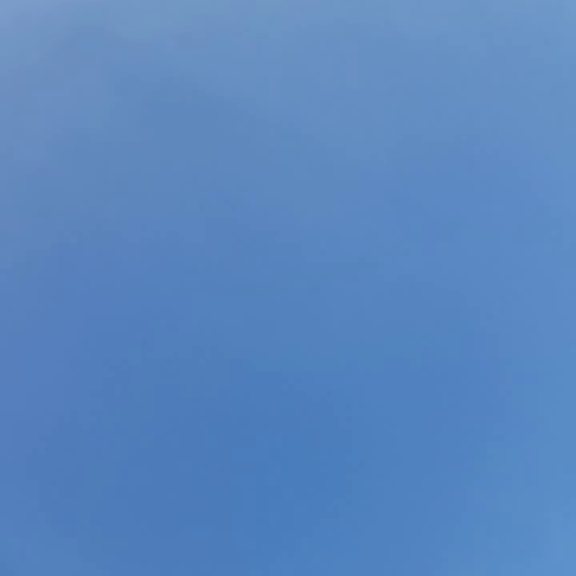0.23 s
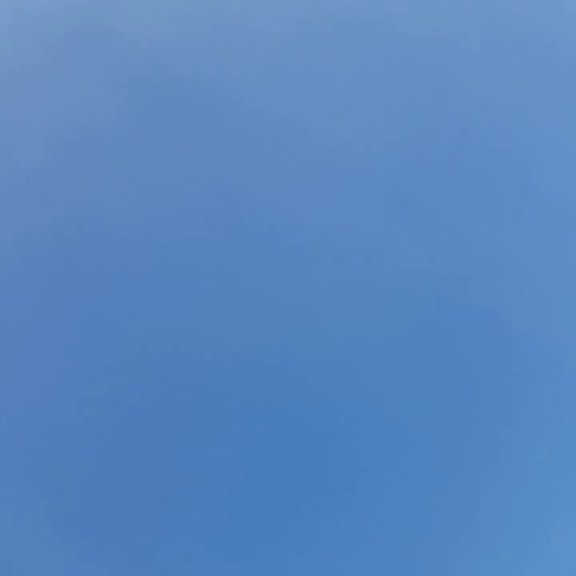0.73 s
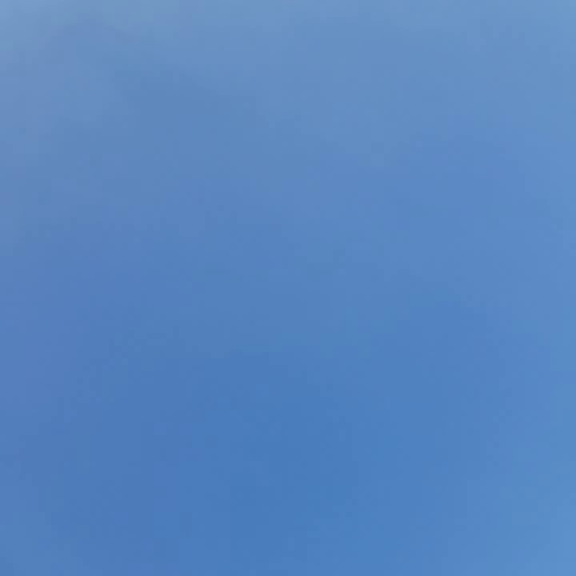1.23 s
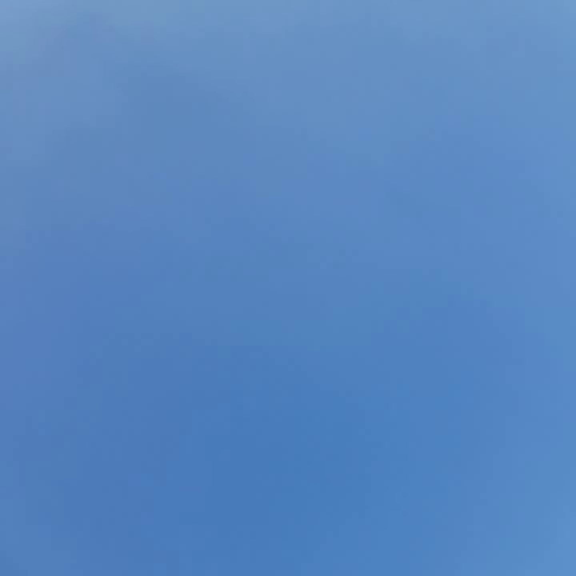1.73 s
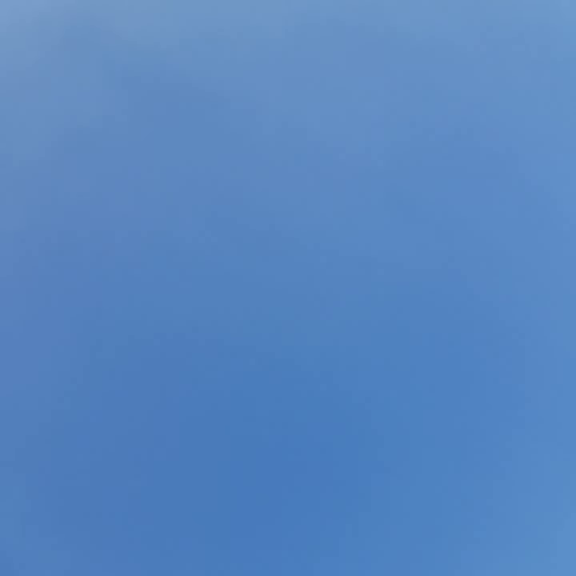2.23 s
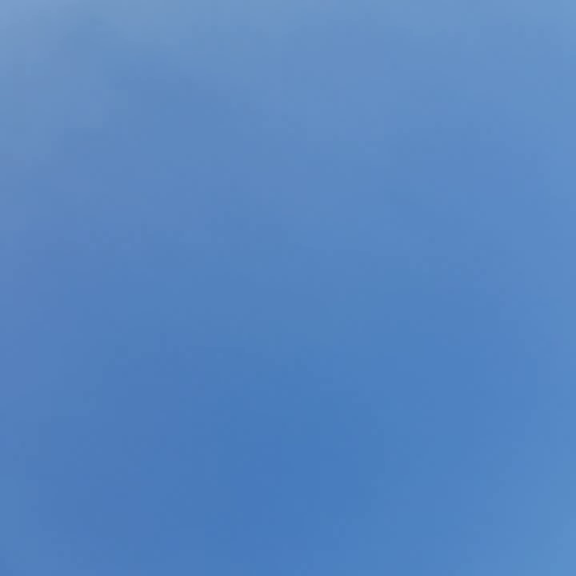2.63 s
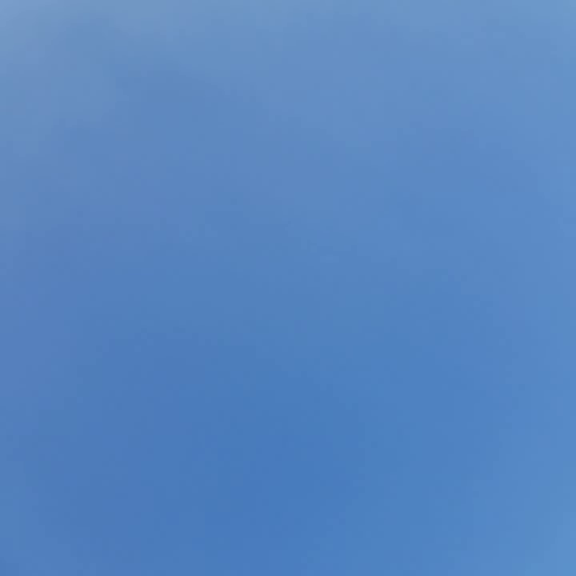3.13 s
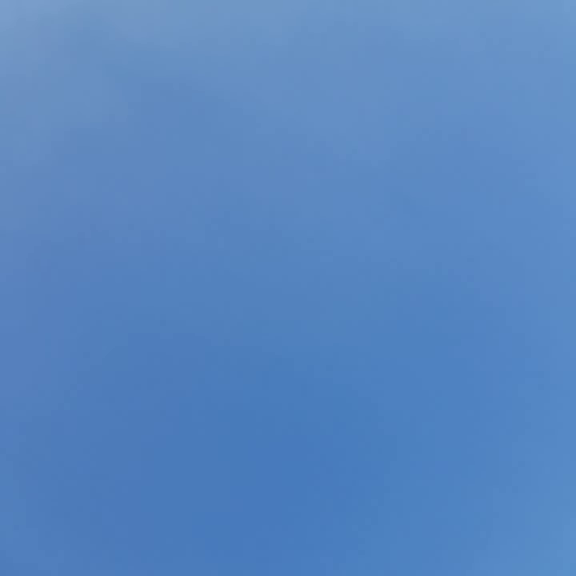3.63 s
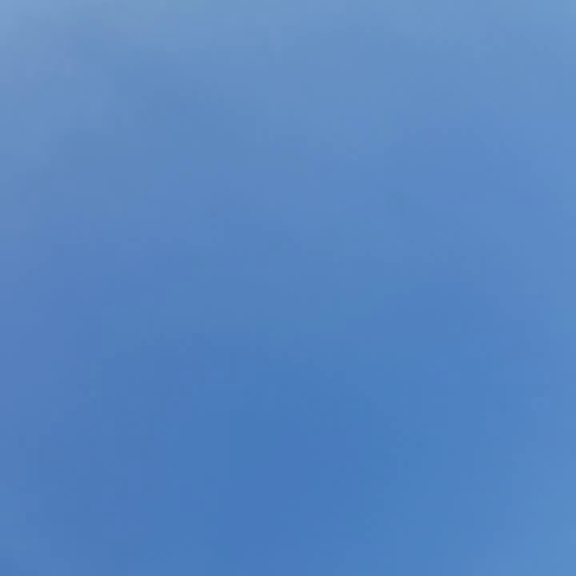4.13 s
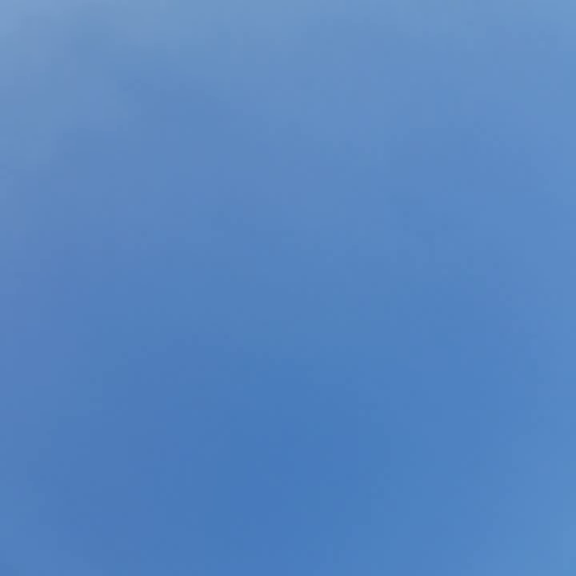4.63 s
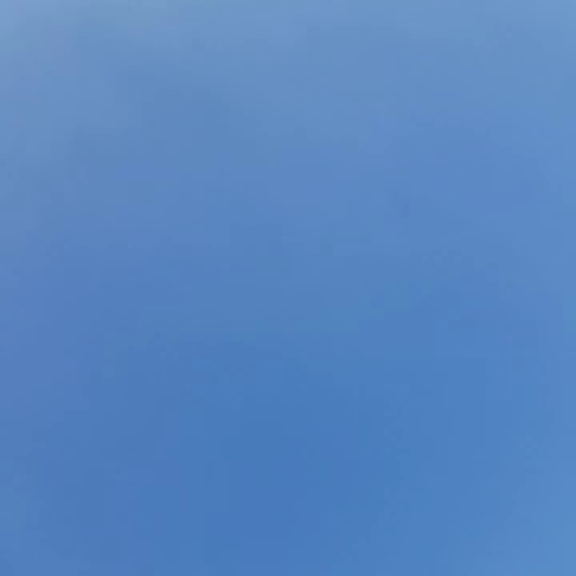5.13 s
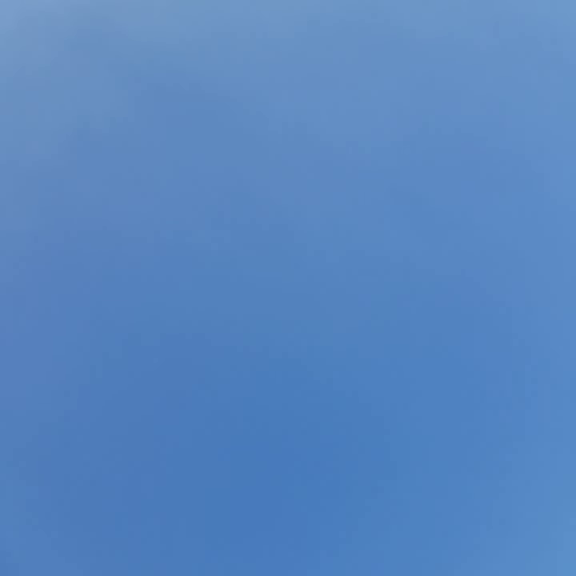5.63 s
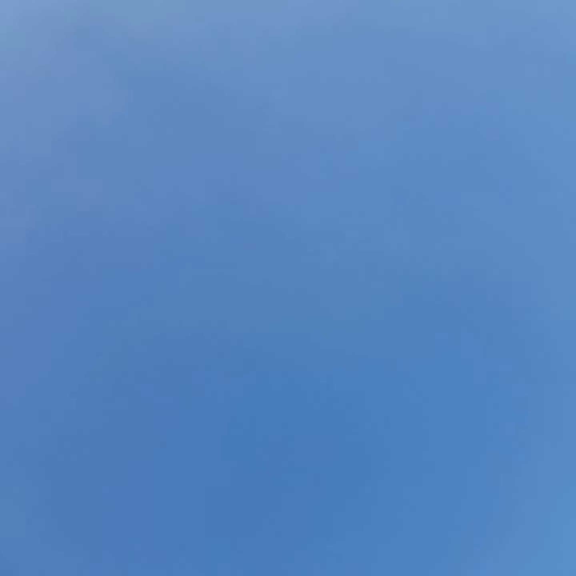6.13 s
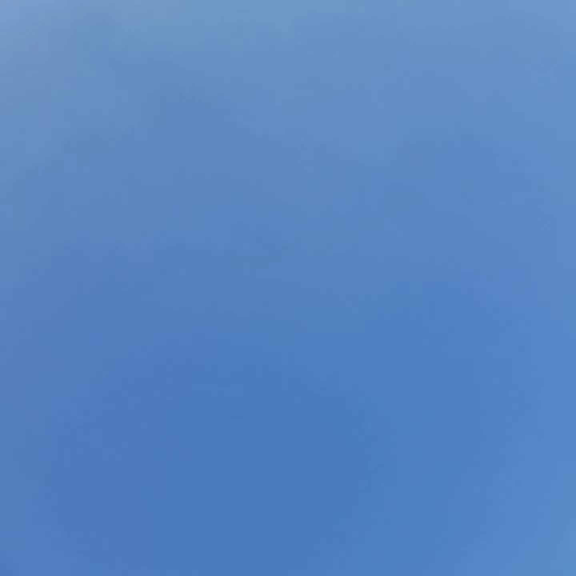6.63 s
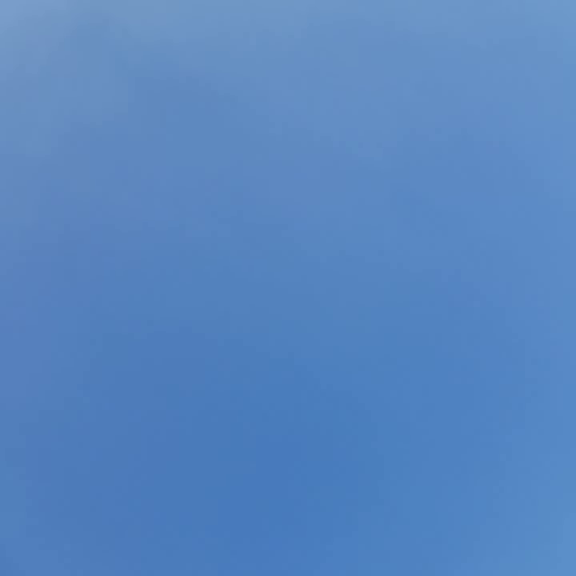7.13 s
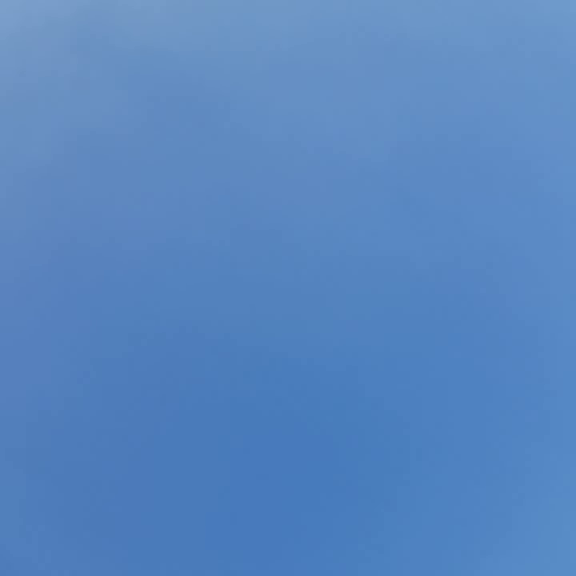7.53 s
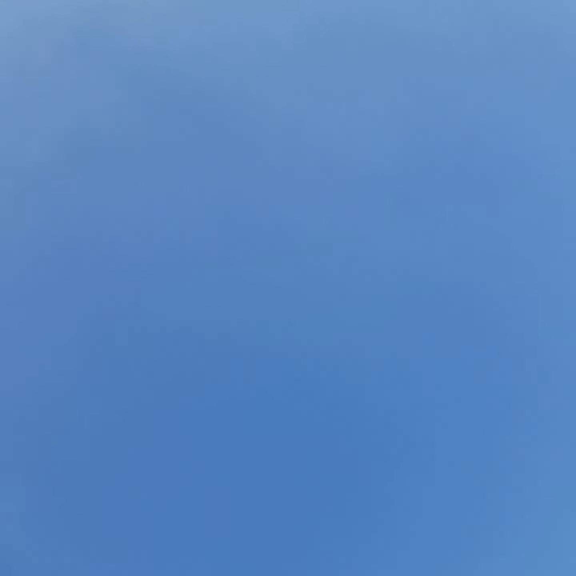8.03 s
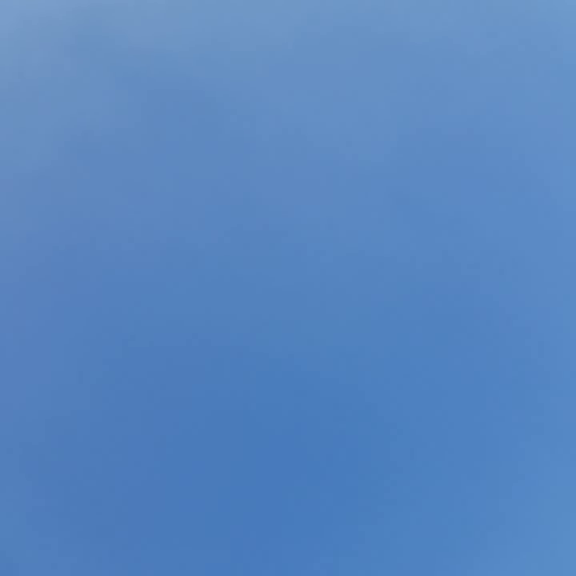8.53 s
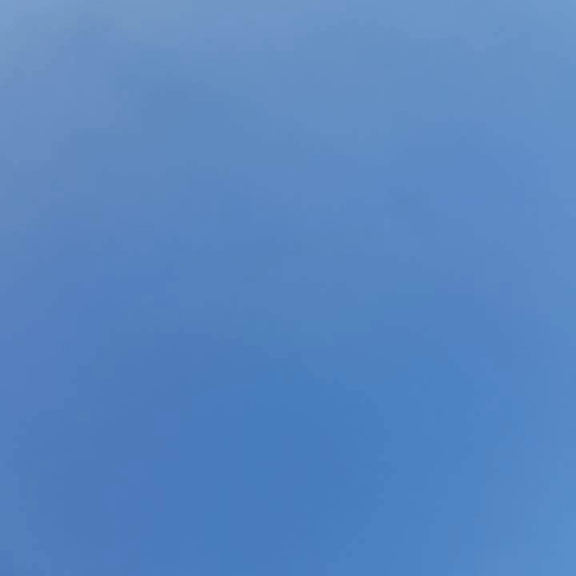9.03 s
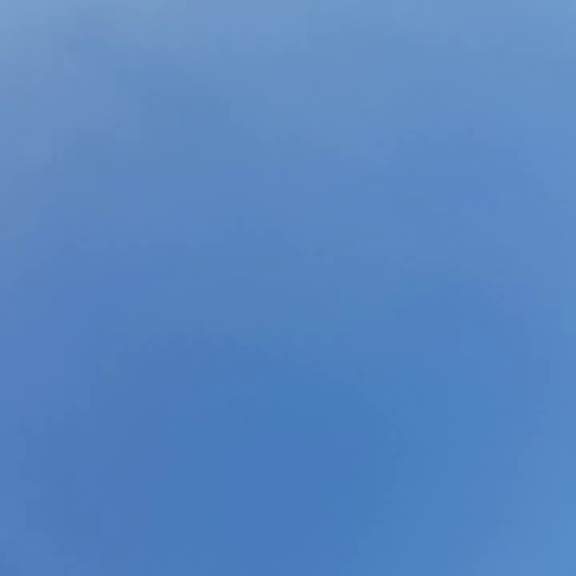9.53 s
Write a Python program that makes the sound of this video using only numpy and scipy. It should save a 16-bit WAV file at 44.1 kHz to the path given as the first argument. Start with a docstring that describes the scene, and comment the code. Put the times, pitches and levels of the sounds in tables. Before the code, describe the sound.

Dawn chorus in stereo: slurs, thin lisps, chips and buzzy notes from birds near and far, with soft dove coos and distant road drone.

```python
"""Among echoing trees at dawn, two spaced microphones hear songbirds near and far over a distant road.
Birds whistle, slur, chip and buzz, each a gliding tone with its own perch and echo; a dove coos far off.
A blur of farther birds lies behind them. Shaped noise makes the blur, the engine drone and tyre roar
of the traffic, and a faint hiss."""
import sys
import numpy as np
from scipy import signal
from scipy.fft import rfft, irfft, next_fast_len
from scipy.io import wavfile
from scipy.ndimage import uniform_filter1d, map_coordinates

SR = 44100
rng = np.random.default_rng(int(sys.argv[2]) if len(sys.argv) > 2 else 0)


def to_wav(s):
    """Save 16-bit WAV."""
    ch = np.atleast_2d(s).T  # columns
    pcm = np.round(np.clip(ch, -1, 1) * 32767)  # PCM
    wavfile.write(sys.argv[1], SR, pcm.astype(np.int16))


N = 431298  # length of the scene in samples

# In the note tables level_db is relative: add() and placed() apply further gains.


def amp(db):
    """Turn dB into a gain."""
    return 10 ** (np.asarray(db) / 20)


def unit(x):
    """Scale a sound to rms 1."""
    return x / np.sqrt(np.mean(x ** 2) + 1e-20)


def along(points, hz):
    """Read a curve of (Hz, value) points, straight between them on a log-frequency axis."""
    point_hz, value = np.transpose(points)
    return np.interp(np.log(hz + 1), np.log(point_hz + 1), value)


def wobble(rate, size=N):
    """A smooth random curve through rate knots a second."""
    knots = rng.standard_normal(int(size * rate / SR) + 4)
    return map_coordinates(knots, [np.arange(size) * rate / SR])


def filtered(x, response):
    """Weight the spectrum of x by a response of frequency."""
    size = next_fast_len(N + 8192)
    spectrum = rfft(x, size) * response(np.fft.rfftfreq(size, 1 / SR))
    return irfft(spectrum, size)[..., :N]


def rush(spectrum):
    """Stereo noise of rms 1: mid and side shares set how alike the microphones are at each frequency."""
    # likeness of the two microphones: hz, left_right_correlation (-1 to 1)
    likeness = [(60, 0.98), (180, 0.94), (550, 0.56), (1650, -0.49), (4970, 0.79), (15000, -0.094)]

    def mid_side_shares(hz):
        """The correlation is the cosine of twice the mid-side angle."""
        angle = np.arccos(np.clip(along(likeness, hz), -1, 1)) / 2
        return amp(along(spectrum, hz)) * [np.cos(angle), np.sin(angle)]

    mid, side = filtered(rng.standard_normal((2, N)), mid_side_shares)
    return unit(np.array([mid + side, mid - side]))


def arc(start_hz, middle_hz, end_hz):
    """A note's pitch as a parabola through three pitches."""
    u = np.linspace(-1, 1, num=9)
    slope = (end_hz - start_hz) / 2
    bend = (start_hz + end_hz) / 2 - middle_hz
    return middle_hz + u * slope + u * u * bend


def series(s, step, count, *ends):
    """Evenly spaced times, with each (first, last) pair drifting from one value to the other."""
    k = np.arange(count)
    drifts = [first + (last - first) * k / (count - 1) for first, last in np.reshape(ends, (-1, 2))]
    return zip(s + step * k, *drifts)


def add(out, s, length, pitch, db, pan_db=0, swing_hz=0, flutter_hz=0, edge=0.0047, octave_db=-48,
        swell=0.043, smooth=8):
    """Add one note: an unsteady gliding tone and a weak octave, made burry by frequency modulation."""
    t = np.arange(int((length + edge) * SR)) / SR
    hz = np.interp(t, np.linspace(0, length, len(pitch)), pitch)
    hz = uniform_filter1d(hz, len(t) // smooth + 1, mode="nearest")  # rounds the glide's corners
    hz = hz * (1 + 0.0053 * wobble(90.8, size=len(t)))
    beat = 2 * np.pi * np.cumsum(flutter_hz * (1 + .05 * wobble(40, size=len(t)))) / SR
    rasp = swing_hz ** 2 / 4000 * wobble(300, size=len(t))  # wide swings turn irregular
    phase = 2 * np.pi * (np.cumsum(hz + swing_hz * np.sin(beat) + rasp) / SR + rng.random())
    # swell is the share of the length taken to start; edge (s) is the shortest rise or fall
    rise = t / max(edge, swell * length)
    fall = (t[-1] - t) / max(edge, 0.2 * length)
    shape = np.sin(np.pi / 2 * np.clip(np.minimum(rise, fall), 0, 1)) ** 2
    tone = np.sin(phase) + amp(octave_db) * np.sin(2 * phase)
    tone = tone * shape * amp(db + 6 + 0.51 * wobble(60.3, size=len(t)))
    start = round(s * SR)
    stereo = tone * amp([[pan_db / 2], [-pan_db / 2]])  # positive pan is louder on the left
    out[:, start:start + len(t)] += stereo[:, :N - start]


def placed(dry, bearing, direct_db, echo_db):
    """The nearer microphone hears the perch first (-1 left, 1 right); trunks and leaves return a tail."""
    spacing = 21  # samples of travel between the microphones
    # decay of the echo among the trees: hz, t60_s
    trees = [(500, 0.14), (2500, 0.99), (5000, 0.75), (8000, 0.48)]
    late = np.pad(dry, ((0, 0), (round(abs(bearing) * spacing), 0)))[:, :N]
    direct = np.array([dry[0], late[1]] if bearing < 0 else [late[0], dry[1]])
    hz, t, grains = signal.stft(rng.standard_normal((2, SR)), SR, nperseg=256)
    decay = amp(-60 * t / along(trees, hz)[:, None])  # treble dies sooner than the middle
    onset = 1 - np.exp(-t / 0.0018)
    tail = signal.istft(grains * decay * onset, SR, nperseg=256)[1]
    tail = tail / np.linalg.norm(tail[0])
    echo = signal.fftconvolve(dry.mean(axis=0)[None], tail, axes=1)[:, :N]
    return amp(direct_db) * direct + amp(echo_db) * echo


def singer(notes, pan_db, bearing, direct_db, echo_db, **voice):
    """All notes (start, length, pitches, level) of one voice, heard from one perch with its echo."""
    out = np.zeros((2, N))
    for s, length, *pitch, db in notes:
        add(out, s, length, pitch, db, pan_db, **voice)
    return placed(out, bearing, direct_db, echo_db)


def traffic():
    """Distant road: a drifting low engine drone under a steadier tyre roar, both shaped noise."""
    # how the road swells and sinks: start_s, engine_drone_db, tyre_roar_db
    levels = [(0.0, -51, -51.5), (1.8, -54.5, -52), (5.3, -52.5, -52.5), (6.1, -56, -53.5),
              (6.8, -50.5, -52.5), (7.52, -54.5, -51.5), (7.68, -56, -53), (8.83, -52, -54.5),
              (9.78, -55, -55)]
    # relative spectra of engines and tyres: hz, density_db
    drone_spectrum = [(12, -47), (20, -39.5), (43, -1.5), (59, 4.5), (130, -6.5), (162, -18.5),
                      (200, -15.5), (260, -49), (440, -120)]
    roar_spectrum = [(82, -27.5), (140, -6), (238, -8.5), (334, -4.5), (595, -4.5), (824, -1.5),
                     (1210, -10), (1680, -22), (1890, -26), (2500, -26), (3250, -33.5), (5500, -120)]
    s, drone_db, roar_db = np.transpose(levels)
    t = np.arange(N) / SR
    drone_gain = amp(np.interp(t, s, drone_db) + 1.1 * wobble(5.0))
    roar_gain = amp(np.interp(t, s, roar_db) + 1.1 * wobble(2.545))
    return drone_gain * rush(drone_spectrum) + roar_gain * rush(roar_spectrum)


def far_chorus():
    """Random far chirps that arrive almost wholly as echo, over a noise blur of still farther birds."""
    # relative spectrum of the birds blurred together: hz, density_db
    blur_spectrum = [(880, -30), (1500, -4.5), (1720, -18), (3990, -3.5), (5660, -1.5), (7610, -1.5),
                     (9200, -48), (12000, -72.5), (20200, -120)]
    out = np.zeros((2, N))
    for when, long, high, glide, size in rng.random((90, 5)):
        hz = 2400 * 2.9 ** high
        add(out, when * N / SR, 0.027 + 0.046 * long, (hz, hz * (0.99 + .5 * glide)), -80 + 7 * size)
    blur = amp(-77 + .8 * wobble(3)) * rush(blur_spectrum)
    return placed(out, 0, -99, 0) + blur


def lisps():
    """Thin notes on the left: both sides of the voice box sound, 520 Hz apart, each fluttering."""
    # when the notes come: start_s, length_s, level_db
    thin_notes = [(0, 0.076, -57.5), (0.16, 0.18, -61.5), (0.493, 0.152, -66.5), (0.996, 0.094, -59),
                  (1.362, 0.089, -59), (1.808, 0.13, -61.5), (2.025, 0.03, -57), (2.629, 0.053, -60.5),
                  (2.861, 0.046, -58.5), (2.984, 0.086, -58.5), (3.158, 0.1, -57.5), (3.308, 0.073, -67),
                  (3.541, 0.13, -61), (3.901, 0.12, -61), (4.087, 0.08, -60.5), (4.315, 0.13, -60.5),
                  (4.884, 0.096, -59), (5.004, 0.089, -61.5), (5.148, 0.12, -60), (5.432, 0.065, -67),
                  (5.674, 0.077, -60.5), (6.63, 0.17, -61.5), (6.87, 0.14, -59.5), (7.48, 0.057, -58.5),
                  (7.586, 0.18, -66), (7.76, 0.068, -61), (8.084, 0.18, -61.5), (8.41, 0.045, -56.5),
                  (8.819, 0.13, -63), (9.11, 0.12, -68), (9.437, .2, -65.5)]
    # glide of the lower voice: length is shared evenly among pitch_hz values
    lower_hz = (7760, 7280, 7785, 7410)
    out = np.zeros((2, N))
    for s, length, db in thin_notes:
        pitch = np.array(lower_hz) * (1 + .01 * rng.standard_normal())
        add(out, s, length, pitch, db - 2.0, swing_hz=103, flutter_hz=78.8, edge=0.0074)
        add(out, s, length, pitch + 520, db - 8, swing_hz=151, flutter_hz=110.0, edge=0.03)
    return placed(out, -.95, -6.5, -0.98)


def dove():
    """A far dove's low coos, each a tone aimed at one steady pitch."""
    # the coos: start_s, length_s, pitch_hz, level_db
    coo_notes = [(0, 0.52, 553, -67.5), (.55, 0.26, 544, -68.5), (.1, 0.29, 459.4, -70.5),
                 (.55, 0.81, 467.4, -72), (2.45, 0.59, 465, -74), (5.08, 0.2, 544, -67.5)]
    coos = [(s, length, hz, hz, db) for s, length, hz, db in coo_notes]
    return singer(coos, .1, -.1, 5.0, -4)


def slurring_bird():
    """Runs of falling slurs coloured by the bird's throat, with low whistles between or leading them."""
    # runs of slurs: start_s, step_s, count, first_level_db, last_level_db
    slur_runs = [(.022, .273, 5, -58.5, -59.5), (8.635, .2703, 5, -59.5, -55.5)]
    # runs of low whistles: start_s, step_s, count, first_hz, last_hz, first_level_db, last_level_db
    answer_runs = [(.198, .276, 4, 1866, 1807, -65.5, -70.5), (8.54, .271, 5, 1948, 1885, -65, -65)]
    # slow slurs that open the second song: start_s, level_db
    opening = [(7.81, -65), (8.29, -60.5)]
    # the quick and the slow slur: length_s, then pitch_hz along the glide
    quick_slur = (.056, 5430, 4650, 3950, 3350)
    slow_slur = (.078, 4400, 4100, 3700, 3300)
    # resonance of the throat: hz, gain_db
    beak = [(2300, -6.5), (3000, -3), (3800, 1.1), (4500, -1), (5300, -9.5)]
    hook = (0.0259, 3600, 2350, 2150)  # low ending of every slur: length s, then pitch Hz
    lead_s, lead_hz, lead_db = 0.092, 1900, -8  # whistle ahead of each slow slur; level beside the slur

    slurs = [(s, *quick_slur, db) for run in slur_runs for s, db in series(*run)]
    slurs += [(s, *slow_slur, db) for s, db in opening]
    slurs += [(s + length, *hook, db) for s, length, *_, db in slurs]
    answers = [row for run in answer_runs for row in series(*run)]
    answers += [(s - lead_s, lead_hz, db + lead_db) for s, db in opening]
    whistles = [(s - .01, .09, hz - 30, hz + 20, hz - 40, db) for s, hz, db in answers]
    throaty = filtered(singer(slurs, -2.5, -1, 2.2, -5.5), lambda hz: amp(along(beak, hz)))
    return throaty + singer(whistles, -7.5, -1, -0.99, -6, edge=0.023, swell=0.35)


def calls():
    """Falling chips, fluttered pips and buzzes, mostly louder on the right, one chip much louder on the left."""
    # fast downward calls from several perches: start_s, start_hz, level_db, left_right_db
    chips = [(0.095, 7050, -52, -5), (0.569, 7500, -55, -4), (1.171, 8060, -52.5, -3),
             (6.763, 6880, -56, -19.5), (7.247, 7660, -47.5, -8), (8.27, 7700, -49.5, -6),
             (8.639, 7830, -49.5, 17.5), (9.442, 8180, -58.5, -19)]
    # burry notes: start_s, length_s, start_hz, end_hz, pitch_swing_hz, flutter_hz, level_db
    buzzes = [(2.894, 0.41, 4515, 4440, 642, 334, -59.5), (3.629, 0.11, 2500, 2636, 241, 99, -58),
              (4.481, 0.13, 6700, 5960, 620, 196.4, -61.5), (4.491, 0.23, 3830, 4340, 244, 148.3, -66.5),
              (4.815, 0.052, 4510, 5500, 119, 146, -57), (4.795, .1, 6270, 5880, 500, 201, -66),
              (5.8, 0.073, 2670, 2587, 310, 121.7, -54.5), (7.211, 0.109, 4170, 4050, 200, 149.4, -61.5),
              (7.902, 0.14, 2620, 2200, 398, 150.5, -71), (8.41, 0.066, 6300, 6050, 630, 221.4, -49.5),
              (9.547, .027, 7630, 7290, 60, 150, -49.5)]
    # short rough calls: start_s, level_db
    pips = [(7.59, -65), (7.634, -56), (7.81, -59.5), (7.862, -55)]
    chip_s, chip_fall_hz = .02, 1266
    clear, burry = np.zeros((2, 2, N))
    for s, hz, db, pan_db in chips:
        add(clear, s, chip_s, (hz, hz - chip_fall_hz), db, pan_db, edge=0.0023)
    for s, db in pips:
        add(burry, s, .02, (2000, 1900), db, -4, swing_hz=250, flutter_hz=148)
    for s, length, start_hz, end_hz, swing_hz, flutter_hz, db in buzzes:
        add(burry, s, length, (start_hz, end_hz), db, -4, swing_hz, flutter_hz, edge=0.02, octave_db=-51)
    return placed(clear, 0.98, -7.5, -1.3) + placed(burry, 0.98, -0.5, -2.1)


def whistler():
    """Clear gliding whistles from the right, with a slightly stronger octave."""
    # the whistles: start_s, length_s, start_hz, end_hz, level_db
    whistle_notes = [(.122, 0.024, 7260, 8000, -58), (3.417, .04, 5090, 4980, -51),
                     (3.508, 0.045, 3903, 4010, -49), (3.792, .089, 6250, 6310, -65),
                     (5.229, 0.083, 4900, 5060, -59.5), (6.127, 0.09, 4450, 4545, -54),
                     (7.176, .056, 4520, 3670, -54), (8.335, 0.087, 5830, 6520, -46.5),
                     (8.543, 0.095, 6210, 6020, -48)]
    return singer(whistle_notes, -4.0, .93, -4, -2.3, octave_db=-33)


def thrush():
    """A thrush's slurred notes on the right, mostly low, one doubled by its octave; each is a fluttered arc."""
    # the notes: start_s, length_s, start_hz, middle_hz, end_hz, level_db
    carol = [(0.18, 0.1, 2593, 2560, 2610, -60), (0.283, 0.1, 3150, 2910, 2860, -65.5),
             (.612, 0.029, 2340, 2280, 2110, -62.5), (0.676, 0.028, 2380, 2190, 2060, -56.5),
             (0.709, 0.022, 2230, 2610, 2430, -58.5), (.81, .034, 2300, 2230, 2820, -60),
             (.86, 0.062, 2700, 2820, 2250, -63.5), (0.91, 0.052, 2080, 2260, 2500, -71),
             (0.979, 0.029, 2940, 2260, 1760, -57), (1.148, .057, 2550, 2400, 2167, -54),
             (1.226, 0.059, 2490, 2220, 2536, -59.5), (1.287, .03, 2650, 2320, 2110, -58.5),
             (1.445, 0.035, 3280, 2450, 1790, -57), (2.587, .044, 2110, 1960, 1620, -61),
             (3.127, 0.042, 2060, 1996, 1770, -60.5), (3.78, 0.14, 3173, 3147, 3143, -57.5),
             (3.905, 0.13, 2470, 2385, 2440, -53), (4.232, .11, 3100, 2340, 2180, -61.5),
             (4.473, .12, 2540, 2640, 3150, -64), (4.6, 0.054, 2080, 2180, 1995, -67),
             (4.641, 0.089, 2020, 1800, 1715, -55.5), (4.665, 0.1055, 2610, 2578, 2530, -53.5),
             (4.786, .08, 3490, 2957, 3100, -59), (5.139, 0.065, 2110, 2050, 2250, -60),
             (5.198, 0.052, 2280, 2573, 2090, -53.5), (5.327, .24, 3100, 3358, 2547, -60),
             (5.33, .21, 6140, 6740, 5430, -51), (5.864, 0.036, 1610, 1897, 1890, -51.5),
             (5.923, .014, 2280, 2057, 1750, -54), (6.063, 0.024, 2710, 2490, 1950, -57),
             (6.185, 0.142, 3235, 3114, 3066, -61.5), (6.37, 0.072, 1607, 1645, 1720, -59.5),
             (6.432, 0.018, 1730, 1842, 1490, -55), (6.98, .1, 3720, 3410, 3400, -61),
             (7.022, 0.08, 2227, 2883, 3170, -52.5), (7.078, 0.039, 3150, 3050, 2690, -54),
             (7.12, 0.101, 3000, 3050, 2950, -61), (7.409, 0.087, 2800, 2683, 2500, -66),
             (8.97, 0.058, 2310, 2290, 2470, -55.5), (9.016, 0.025, 2330, 3010, 3800, -56),
             (9.045, 0.04, 3700, 2880, 2520, -51), (9.08, 0.041, 2485, 2510, 2380, -50.5),
             (9.191, 0.018, 2500, 2100, 1660, -56.5), (9.25, 0.071, 2627, 2310, 2170, -57),
             (9.65, 0.057, 3050, 3100, 2770, -57), (9.703, 0.059, 3010, 2305, 3190, -56)]
    notes = [(s, length, *arc(*pitch), db) for s, length, *pitch, db in carol]
    return singer(notes, -8.0, 0.93, -1.74, -2.44, swing_hz=35, flutter_hz=70.7, swell=0.22)


def flicking_bird():
    """On the right, whistle-and-flick triplets, then fluttered whistles with flicks; lone upward calls."""
    # lone upward calls: start_s, length_s, start_hz, end_hz, level_db
    upcalls = [(1.907, .007, 5560, 7400, -64.5), (2.018, .011, 6130, 7600, -66),
               (6.109, 0.023, 2690, 4680, -53.5), (6.771, 0.011, 3000, 3960, -57.5),
               (7.222, 0.015, 3880, 8350, -56.5), (5.222, 0.014, 3990, 5030, -66),
               (8.387, 0.0065, 6500, 6900, -48)]
    # whistle, high flick, low flick: start_s, whistle_level_db, flicks_level_db
    triplets = [(2.083, -57, -55.5), (2.416, -53, -56), (2.682, -50.5, -54)]
    # burry whistles, a high flick before each but the first: start_s, level_db
    burrs = [(3.866, -47.5), (4.13, -48), (4.404, -49.5)]
    # strokes: length s, then pitch Hz along the glide
    whistle = (0.066, 3455, 3495, 3475)
    high_flick, low_flick = (.022, 5800, 7200, 7600, 7800), (.0084, 3880, 4600, 5410)
    burr = (0.09, 4850, 4755)
    high_after_s, low_after_s = .063, .102  # flicks after the start of the triplet's whistle
    flick_before_s, burr_flick_db = .064, -8.5  # flick ahead of a burry whistle; level beside it

    soft = [(s, *whistle, db) for s, db, _ in triplets]
    flicks = [(s + high_after_s, *high_flick, db) for s, _, db in triplets]
    flicks += [(s + low_after_s, *low_flick, db) for s, _, db in triplets]
    flicks += [(s - flick_before_s, *high_flick, db + burr_flick_db) for s, db in burrs[1:]]
    for s, length, low, high, db in upcalls:
        flicks.append((s, length, *arc(low, low + .62 * (high - low), high), db))
    burry = [(s, *burr, db) for s, db in burrs]
    return (singer(flicks, -2.5, 0.94, -.1, 0, edge=0.00038)
            + singer(soft, -1.5, .93, 0.5, -2.5, swell=0.23)
            + singer(burry, -4, 0.98, -0.5, -2.1, swing_hz=120, flutter_hz=282, edge=0.02, octave_db=-51))


def trilling_bird():
    """A trill that swells and slows: each upward stroke is followed by a fainter downward one."""
    # the upward stroke: length_s, then pitch_hz along the glide
    up_stroke = (.035, 4820, 5320, 6160, 6880)
    start_s, step_s, slows_s, count = 2.337, .1172, .00084, 13  # each step is slows_s longer than the last
    first_db, full_db, swell_s = -66.5, -59, 0.41  # swell_s is a time constant
    k = np.arange(count)
    since = step_s * k + slows_s * k * (k - 1) / 2
    level_db = full_db + (first_db - full_db) * np.exp(-since / swell_s)
    strokes = list(zip(start_s + since, level_db))
    notes = [(s, *up_stroke, db) for s, db in strokes]
    notes += [(s + .043, .025, 5400, 4000, db - 3.5) for s, db in strokes]
    return singer(notes, 7.0, -.33, -5.5, -0.5)


def near_singer():
    """The loud bird on the left repeats a syllable: flick down, slur down, swoop up to a held note."""
    # start_s, slur_level_db, slur_length_s, slur_bottom_hz, swoop_after_s, held_level_db,
    # held_from_hz, held_to_hz, held_length_s
    syllables = [(5.547, -47.5, 0.053, 5380, 0.1, -41, 6750, 5890, .13),
                 (5.798, -37, .058, 4760, 0.12, -35, 6710, 6250, 0.14),
                 (6.073, -33.5, .056, 4940, .114, -32.5, 7170, 6350, .105),
                 (6.341, -35.5, 0.054, 5240, .114, -38, 6530, 6850, .1)]
    # the opening flick: length_s, then pitch_hz along the glide
    flick = (0.026, 8100, 6820, 6400, 6050)
    top_hz, hook_hz, flick_db = 7360, 348, -1.5  # slur's top and the hook up to it; flick beside slur
    swoop_hz, swoop_s = 2303, .0095  # held note is reached from this far below; time constant
    falls, held, u = [], [], np.linspace(0, 1, num=25)
    for s, slur_db, slur_s, bottom_hz, after, db, from_hz, to_hz, length in syllables:
        # the slur follows the flick at once: hooks up, falls, rounds off
        slur = bottom_hz + (top_hz - bottom_hz) * np.cos(np.pi / 2 * u) ** 1.7
        slur = slur - hook_hz * np.exp(-u / .07)
        hold = to_hz + (from_hz - to_hz) * (1 - u) ** 1.5
        hold = hold - swoop_hz * np.exp(-u * length / swoop_s)
        falls += [(s, *flick, slur_db + flick_db), (s + flick[0], slur_s, *slur, slur_db)]
        held += [(s + after, length, *hold, db)]
    near = np.zeros((2, N))
    for notes, share in ((falls, .08), (held, .24)):  # falls start quickly, held notes swell in
        for s, length, *pitch, db in notes:
            add(near, s, length, pitch, db, 8.0, swell=share, smooth=40)
    return placed(near, -.95, -8.0, -9.5)


def scene():
    """Birds near and far over the road."""
    background = traffic() + far_chorus()
    left = lisps() + slurring_bird() + trilling_bird() + near_singer()
    right = calls() + whistler() + thrush() + flicking_bird()
    return background + left + right + dove()


def record(dry):
    """A faint treble hiss is added; nothing is kept above the band limit."""
    # relative spectrum of the hiss: hz, density_db
    hiss_spectrum = [(5590, -44), (9500, -36.5), (10500, -12.5), (11800, 1.5), (15100, 3), (15600, 0.5)]
    top_hz = 15720
    return filtered(dry + amp(-73.5) * rush(hiss_spectrum), lambda hz: hz < top_hz)


dry = scene()
out = record(dry)
to_wav(out)
```